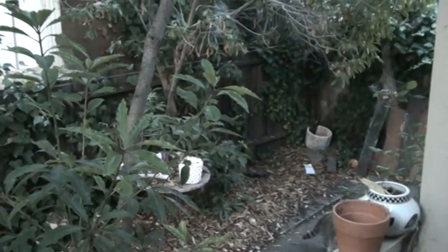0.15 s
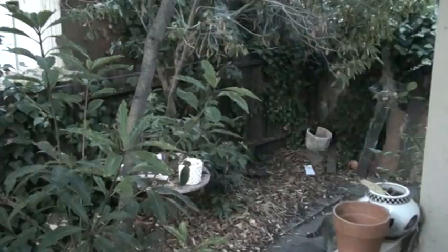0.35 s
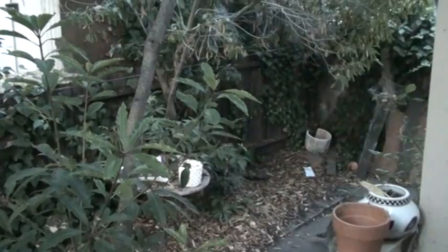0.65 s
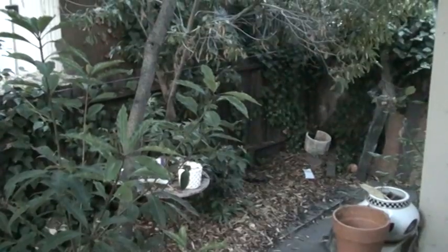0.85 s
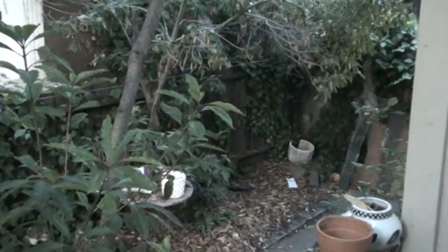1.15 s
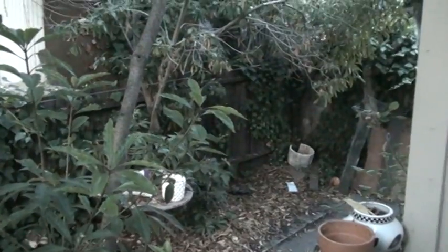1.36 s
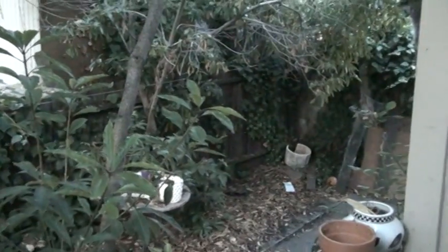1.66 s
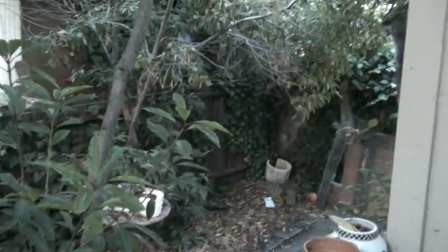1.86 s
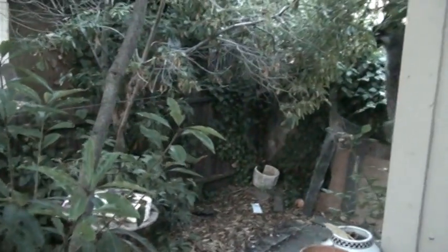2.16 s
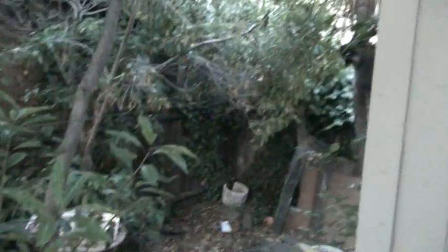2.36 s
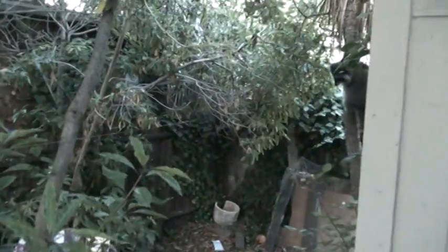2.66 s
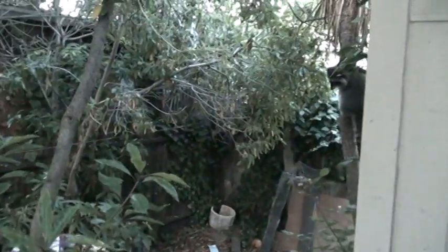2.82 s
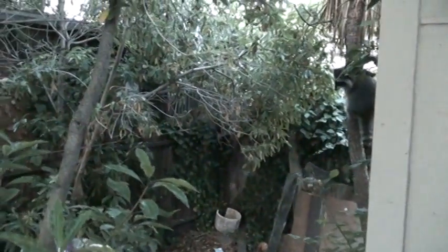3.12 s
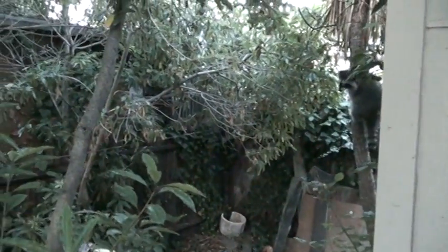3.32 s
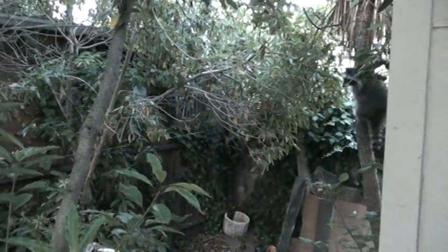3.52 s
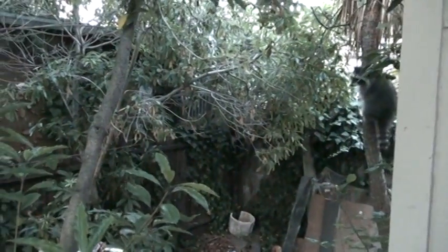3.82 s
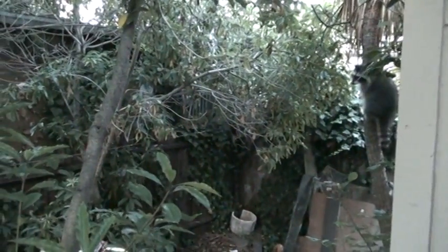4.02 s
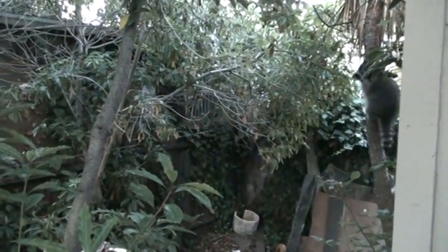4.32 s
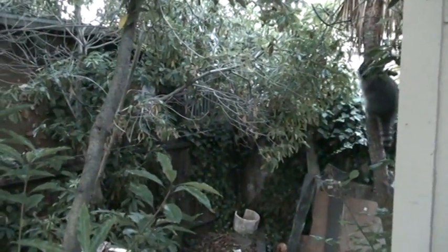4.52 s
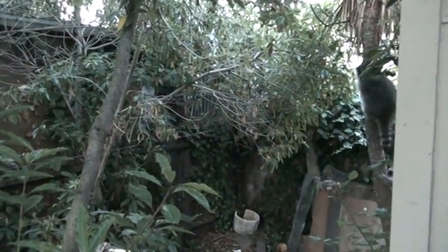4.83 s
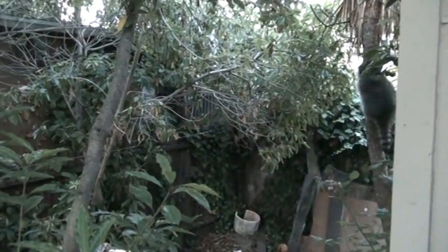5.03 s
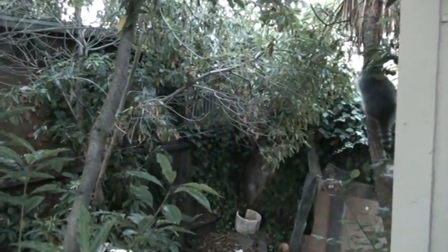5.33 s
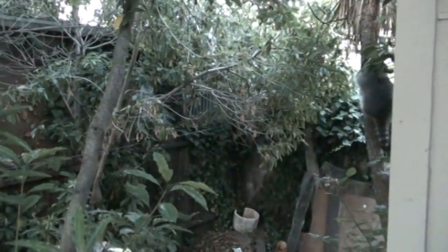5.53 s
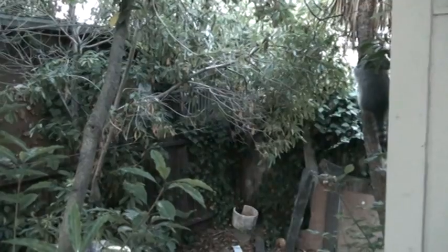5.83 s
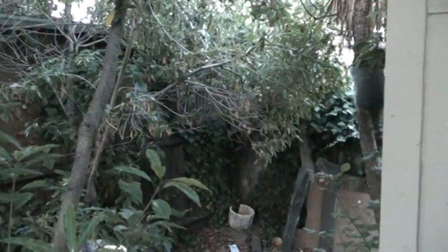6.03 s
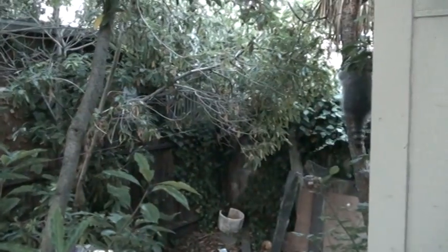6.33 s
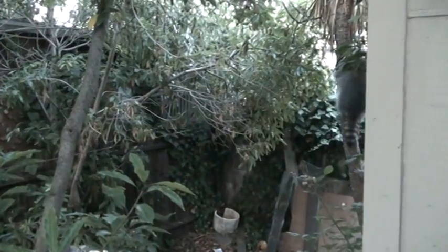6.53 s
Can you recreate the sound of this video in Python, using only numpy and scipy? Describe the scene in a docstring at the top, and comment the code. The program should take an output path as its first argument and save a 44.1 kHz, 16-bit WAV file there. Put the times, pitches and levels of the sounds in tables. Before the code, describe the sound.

A small leafy backyard with steady low traffic rumble and an uneven deep hum. Claws snap and scratch on bark, leaves rustle softly, and a far bird whistles. A raccoon in the foliage rasps and breaks into a short squeal early, again past the middle, then a much louder, closer scream starts rising just as it ends.

```python
"""Raccoons chitter in a small fenced backyard: two rasping, rising calls from the foliage, then a loud one close by.
Each voice is unsteady vocal folds and pulsing air, shaped by a throat that moves as the mouth opens.
Claws scratch on bark in bursts of tiny snaps, leaves rustle as filtered hiss, a far bird whistles gliding sines.
The city sounds underneath as shaped noise, with a deep, unsteady hum, and the camera adds a thin whine."""
import sys
import numpy as np
from scipy import signal
from scipy.fft import rfft, irfft
from scipy.io import wavfile
from scipy.ndimage import uniform_filter1d

SR = 44100
rng = np.random.default_rng(int(sys.argv[2]) if len(sys.argv) > 2 else 0)


def transcribe(signal):
    """Save signal, clipped to [-1, 1], as a 16-bit WAV file at the path in sys.argv[1]."""
    frames = np.atleast_2d(signal).T
    limited = np.clip(frames, -1, 1)
    pcm = np.round(limited * 32767).astype(np.int16)
    wavfile.write(sys.argv[1], SR, pcm)


N = 294308
TIME = np.arange(N) / SR
BINS = np.maximum(np.fft.rfftfreq(N, 1 / SR), 1)   # Hz, kept off zero for the log axis
CUTOFF_HZ = 16400   # top of the band


def from_db(db):
    """Decibels to gain."""
    return 10 ** (np.asarray(db) / 20)


def rms_one(x):
    """Scale to unit power."""
    return x / np.sqrt(np.mean(x ** 2) + 1e-20)


def in_time(rows):
    """Each column of a curve at every sample."""
    s, *columns = np.transpose(rows)
    return [np.interp(TIME, s, c) for c in columns]


def at_hz(points, hz):
    """Read a spectrum on a log-frequency axis."""
    f, value = np.transpose(points)
    return np.interp(np.log(hz), np.log(f), value)


def coloured(x, colour):
    """Filter a sound by a spectrum in dB."""
    return irfft(rfft(x) * from_db(at_hz(colour, BINS)), N)


def drift(rate_hz):
    """Random wander of spread 1, mostly slower than the given rate."""
    return rms_one(irfft(rfft(rng.standard_normal(N)) / (1 + (BINS / rate_hz) ** 2), N))


def step(at_s, glide_s):
    """A smooth passage from 0 to 1 around a moment."""
    return .5 + .5 * np.tanh((TIME - at_s) / glide_s)


def pan(x, lean_db):
    """Lean a sound to the left by a level difference."""
    return x * from_db(np.array([[.5], [-.5]]) * lean_db)


def yard(x, wet_db, early_db, spread, lead_s=0):
    """Direct sound, a few hard echoes from wall and fence, and a tail scattered by leaves; power is kept."""
    t60_s, leaf_cut_hz, build_up_s = 0.46, 13000, 0.00097
    echoes = 12
    t = TIME[:SR // 2]
    shared, left, right = rng.standard_normal((3, len(t)))
    scatter = shared + spread * np.array([left, right])
    scatter = scatter * from_db(-60 * t / t60_s) * (1 - np.exp(-t / build_up_s))
    scatter = signal.sosfilt(signal.butter(1, leaf_cut_hz, fs=SR, output="sos"), scatter)
    response = from_db(wet_db) * rms_one(scatter) / np.sqrt(len(t))
    for delay_s in rng.uniform(.003, .028, size=echoes):
        for ear in response:   # echoes from the sides reach the two ears at slightly different times
            ear_lag = int(spread * rng.uniform(0, 1e-4) * SR)
            ear[int(delay_s * SR) + ear_lag] += from_db(early_db) / np.sqrt(echoes)
    response[0, 0] += 1
    response[1, int(lead_s * SR)] += 1   # the left ear may hear the direct sound first
    response /= np.sqrt(np.sum(response ** 2) / 2)
    return signal.fftconvolve(x[None], response, axes=1)[:, :N]


def city():
    """A wash of far traffic with droning bands in it, alike in both ears in the bass."""
    # colour of the city wash: hz, density_db (per Hz, relative)
    wash_colour = [(22, -21), (38, -3), (60, 0.5), (100, -4), (190, 0), (235, -9), (370, -11), (550, -16.5),
                   (760, -16.5), (1300, -22.5), (2600, -30), (4500, -33.5), (7000, -35.5), (10000, -41.5),
                   (16000, -42)]
    # droning bands of traffic and machines: hz, width_hz, level_db
    drones = [(67.7, 3.6, -57.5), (81.2, 5, -53.5), (127.4, 24, -57), (163.4, 13, -57.5),
              (205.5, 5.7, -60.5), (241, 5.6, -68.5), (273.2, 19, -58.5), (291.4, 6.3, -62),
              (454.2, 8.9, -66.5), (499, 27, -62.5), (593, 16, -67.5), (1856, 120, -77)]
    # left-right likeness of the ambience: hz, correlation
    likeness = [(30, .9998), (100, .9995), (200, .994), (330, .91), (650, .66), (1400, .5), (4000, .55),
                (9000, .65), (12000, .995)]
    # its lean, left over right: hz, lean_db
    lean = [(170, 0), (380, -1), (700, -2.6), (1500, -.8), (4000, .3), (12000, 0)]
    wash_db = -49
    wash = from_db(at_hz(wash_colour, BINS)) ** 2
    power = from_db(wash_db) ** 2 * wash / wash.mean()
    for hz, width_hz, level_db in drones:
        band = 1 / (1 + ((BINS - hz) / width_hz) ** 2) ** 2
        power = power + from_db(level_db) ** 2 * band / band.mean()
    mid, side = rfft(rng.standard_normal((2, N)))
    alike = np.clip(at_hz(likeness, BINS), 0, 1)
    ears = np.sqrt((1 + alike) / 2) * mid + np.sqrt((1 - alike) / 2) * side * [[1], [-1]]
    return irfft(pan(ears, at_hz(lean, BINS)) * np.sqrt(power), N)


def road(side_db):
    """Tyres and engines a few streets away, heard as one low band, nearly alike in both ears."""
    # road rumble that comes and goes: time_s, level_db
    rumble = [(0, -50.5), (.8, -53), (2.3, -65.5), (3.4, -49.5), (4.1, -56.5), (5.3, -56), (5.8, -50.5),
              (6.67, -52.5)]
    centre_hz, width_hz = 184.5, 40.5
    band = 1 / (1 + ((BINS - centre_hz) / width_hz) ** 2) ** 2
    mid, side = irfft(rfft(rng.standard_normal((2, N))) * band, N)
    ears = mid + from_db(side_db) * side * [[1], [-1]]
    return from_db(in_time(rumble)[0]) * rms_one(ears)


def deep_hum(third_db):
    """A deep, unsteady hum near 40 Hz with a weaker third harmonic, wandering in pitch and level."""
    # uneven level of the hum, before its flutter: time_s, level_db
    hum_level = [(0.0, -54), (0.17, -41.5), (0.98, -56), (1.15, -77), (1.39, -44), (1.95, -62), (2.17, -47),
                 (2.62, -75), (2.79, -51.5), (3.27, -76), (3.34, -54), (3.73, -62), (3.86, -49.5),
                 (4.31, -69), (4.68, -48.5), (4.81, -60), (5.59, -49.5), (6.67, -57.5)]
    hum_hz, wander_hz, flutter_db = 40.4, 1.77, 2.3
    phase = 2 * np.pi * np.cumsum(hum_hz + wander_hz * drift(8.7)) / SR
    gain = from_db(in_time(hum_level)[0] + flutter_db * drift(14))
    return gain * np.sqrt(2) * (np.sin(phase) + from_db(third_db) * np.sin(3 * phase))


def camera_whine(wander_hz, rate_hz):
    """Thin, faint sines from the camera, each wandering in pitch on its own."""
    # whine: pitch_hz, level_db
    whines = [(7900, -82), (7200, -92), (15735, -97)]
    out = np.zeros(N)
    for pitch_hz, level_db in whines:
        phase = 2 * np.pi * np.cumsum(pitch_hz + wander_hz * drift(rate_hz)) / SR
        out += from_db(level_db) * np.sqrt(2) * np.sin(phase)
    return out


def bird(waver):
    """Pure gliding whistles that swell quickly and fade as the glide slows."""
    # whistles, dry: start_s, length_s, start_hz, end_hz, level_db
    whistles = [ (0.433, .1, 4130, 3650, -70), (0.458, .07, 4400, 4120, -67),
                (0.547, .05, 3380, 3800, -63.5), (0.607, .065, 5800, 6200, -62),
                (0.667, .085, 3220, 2850, -65.5), (1.768, .07, 4570, 5120, -64),
                (2.05, 0.15, 3400, 3630, -72), (2.413, 0.064, 6360, 6520, -65),
                (2.839, .16, 3280, 3600, -70), (2.26, .08, 5100, 5350, -71), (2.44, .06, 4400, 4480, -69),
                (3.545, 0.05, 4200, 4260, -67), (3.591, .3, 4620, 3820, -63.5),
                (5.03, .04, 4550, 4080, -69), (5.105, 0.21, 4980, 4150, -67), (5.40, 0.35, 6060, 5340, -73)]
    peak_share, glide_ease = .33, .75   # loudest a third of the way through; the glide slows towards the end
    fade_db = 16   # per whole length, counted from the peak
    out, wobble = np.zeros(N), 1 + waver * drift(76)
    for start_s, length_s, start_hz, end_hz, level_db in whistles:
        on = (TIME >= start_s) & (TIME < start_s + length_s)
        part = (TIME[on] - start_s) / length_s
        hz = (start_hz + (end_hz - start_hz) * part ** glide_ease) * wobble[on]
        swell = np.clip(np.minimum(part / peak_share, 10 * (1 - part)), 0, 1)
        gain = swell * from_db(level_db - fade_db * np.maximum(part - peak_share, 0))
        out[on] += gain * np.sqrt(2) * np.sin(2 * np.pi * np.cumsum(hz) / SR)
    return out


def foliage(flicker_db):
    """A soft, uneven bed of leaves rubbing together."""
    # foliage stirring under the climbing animals, dry: time_s, level_db
    stir = [(0, -84), (1.1, -109), (1.55, -63.5), (2.1, -69.5), (3.45, -70), (4.0, -74.5), (4.6, -65.5),
            (4.8, -85), (5.8, -65.5), (6.1, -73), (6.4, -66.5)]
    # colour of the stirring leaves: hz, density_db (per Hz, relative)
    leaf_colour = [(1000, -31), (2500, -3), (4500, -5.5), (6100, 5), (7500, -0.5), (9500, -3), (11500, -2),
                   (13000, 0), (16000, -30)]
    hiss = rms_one(coloured(rng.standard_normal(N), leaf_colour))
    return hiss * from_db(in_time(stir)[0] + flicker_db * drift(25))


def scratches(grain_db, grains_per_s):
    """Each scratch is a swell of tiny fibre snaps in one broad band."""
    # the louder scratches on bark and through leaves, dry: peak_s, level_db (at the peak), centre_hz,
    # width_octaves, rise_s
    strokes = [ (0.05, -50, 3400, 1.2, 0.003), (.257, -61, 7000, .8, .004),
               (1.395, -49, 11500, 0.83, 0.0099), (1.592, -55, 7600, .89, 0.016),
               (1.878, -62, 6230, .5, .006), (2.225, -59.5, 4940, .98, .005),
               (2.632, -58.5, 8420, .53, .003), (2.751, -46.5, 8350, 0.86, 0.0032),
               (3.075, -57, 6600, 0.6, 0.023), (3.42, -63, 8000, .7, 0.074),
               (3.522, -57.5, 7500, .7, 0.018), (4.09, -55, 9000, 0.67, 0.016),
               (4.895, -58.5, 7900, 1.1, 0.034), (4.935, -60, 15000, .2, .015),
               (5.18, -64, 10000, .7, 0.033), (5.731, -49, 7000, 1.23, 0.0051),
               (6.138, -50.5, 10500, .83, .016)]
    decay_s, decay_per_rise = 0.014, .9   # a slower stroke also dies away more slowly
    out, t = np.zeros(N + SR), TIME[:SR // 2]
    hz = np.maximum(np.fft.rfftfreq(len(t), 1 / SR), 1)
    lead = SR // 8   # samples of room for the rise before the peak
    age = t - lead / SR
    for peak_s, level_db, centre_hz, octaves, rise_s in strokes:
        snaps = rng.standard_normal(len(t)) * (rng.random(len(t)) < grains_per_s / SR)
        snaps = snaps * from_db(grain_db * np.minimum(rng.exponential(1, len(t)), 4))   # a few snap harder
        band = 1 / (1 + (np.log2(hz / centre_hz) / (2 * octaves)) ** 2) ** 3
        rasping = rms_one(irfft(rfft(snaps) * band, len(t)))
        swell = np.exp(np.minimum(age / rise_s, -age / (decay_s + decay_per_rise * rise_s)))
        start = int(peak_s * SR)
        out[start:start + len(t)] += from_db(level_db) * swell * rasping
    return out[lead:lead + N]


def climbing():
    """Claws on bark and stirring leaves share one colour and the same place in the yard."""
    # colour shared by every rustle: hz, gain_db
    rustle_colour = [(2000, 4), (3200, 2.5), (5000, 0.5), (6200, -0.5), (7000, -2), (9000, -2),
                     (11500, -1.5), (13000, -7), (15000, -4)]
    rustle = scratches(grain_db=1.2, grains_per_s=6700) + foliage(flicker_db=2.5)
    rustle = coloured(rustle, rustle_colour)
    return pan(yard(rustle, wet_db=-7.5, early_db=-7, spread=0.56), 0.71)


def throat_filter(source, opening, throat):
    """Pass the sound through resonances that follow the opening of the mouth."""
    mouth_cut_hz = 1220
    hz, s, frames = signal.stft(source, SR, nperseg=512, noverlap=384)
    hz, opening, power = hz[:, None], np.interp(s, TIME[:len(source)], opening), 0
    for shut_hz, open_hz, width_hz, shut_db, open_db in throat:
        away = (hz - shut_hz - (open_hz - shut_hz) * opening) / width_hz
        strength = from_db(shut_db + (open_db - shut_db) * opening ** 2)   # goes with the area of the mouth
        power = power + (strength / (1 + away ** 2)) ** 2
    radiated = hz ** 4 / (hz ** 4 + mouth_cut_hz ** 4)   # a small mouth radiates little bass
    shaped = frames * np.sqrt(power) * radiated
    return signal.istft(shaped, SR, nperseg=512, noverlap=384)[1][:len(source)]


def raccoon(pitch, rough, opening, gain, throat, jitter, rasp, flutter_db):
    """Unsteady vocal folds and air that hisses through them each cycle, shaped by the throat."""
    on = gain > 0
    pitch, rough, opening = pitch[on], np.clip(rough[on], 0, 1), np.clip(opening[on], 0, 1)
    hz = pitch * (1 + jitter * rough * drift(213)[on])
    phase = 2 * np.pi * np.cumsum(hz) / SR
    folds = np.zeros(len(phase))
    for k in range(1, 32):
        partial = np.cos(k * phase + rng.uniform(0, 2 * np.pi))
        folds += partial * (k * hz < CUTOFF_HZ)
    folds = rms_one(folds * np.sqrt(hz))
    air = rms_one(rng.standard_normal(len(phase)) * (1 + 0.36 * np.cos(phase)))
    source = np.sqrt(1 - rough ** 2) * folds + rasp * rough * air
    voice = throat_filter(source, opening, throat)
    # level the voice over about 9 ms, so that gain and flutter set its loudness
    evened = voice / np.sqrt(uniform_filter1d(voice ** 2, size=400) + 1e-9)
    out = np.zeros(N)
    out[on] = evened * gain[on] * from_db(flutter_db * drift(135)[on])
    return out


def far_call(start_s, break_s, end_s, level_db, squeal_hz, fade_db_per_s):
    """The voice climbs through three registers, each cleaner than the last; the squeal sags and fades."""
    # throat resonances, moving as the mouth opens: shut_hz, open_hz, width_hz, shut_db, open_db
    far_throat = [(1760, 2670, 255, 0.5, -7), (3020, 3020, 130, 7.5, -1), (3380, 4150, 380, -4, 5.5),
                  (4840, 5900, 1900, -9, -6), (6770, 5400, 390, -1, -6), (7750, 7400, 650, -7, -7),
                  (11300, 9500, 1400, -23, -19)]
    rasp_hz, cry_hz, squeal_sag_hz_per_s = 523, 769.4, 1100
    rasp_rough, cry_rough, squeal_rough = .88, 0.725, 0.32
    cry_share = .39   # the cry sets in at this share of the way to the break
    cry_glide_s, break_glide_s = 0.019, 0.00782
    # the mouth is ajar in the cry and gapes just before the break
    cry_opening, mouth_lead_s, mouth_glide_s = 0.22, .014, 0.023
    attack_s, release_s = 0.029, 0.012
    rasp_db = -1   # the rasp is softer than the cry

    cry = step(start_s + cry_share * (break_s - start_s), cry_glide_s)
    squeal = step(break_s, break_glide_s)
    since_break = np.maximum(TIME - break_s, 0)
    pitch = rasp_hz + (cry_hz - rasp_hz) * cry + (squeal_hz - cry_hz) * squeal
    pitch = pitch - squeal_sag_hz_per_s * since_break
    rough = rasp_rough + (cry_rough - rasp_rough) * cry + (squeal_rough - cry_rough) * squeal
    gape = step(break_s - mouth_lead_s, mouth_glide_s)
    opening = cry_opening * cry + (1 - cry_opening) * gape
    envelope = np.clip(np.minimum((TIME - start_s) / attack_s, (end_s - TIME) / release_s), 0, 1)
    gain = envelope * from_db(level_db + rasp_db * (0.5 - cry) - fade_db_per_s * since_break)
    return raccoon(pitch, rough, opening, gain, far_throat, jitter=0.0366, rasp=0.97, flutter_db=1.5)


def far_calls():
    """Calls from the foliage: a rasp steps up to a cry and breaks into a squeal, with strong yard echo."""
    # calls, dry: start_s, break_s, end_s, level_db (midway from rasp to cry), squeal_hz, fade_db_per_s (squeal)
    calls = [(1.109, 1.317, 1.446, -51, 1322, 79), (4.274, 4.498, 4.58, -51, 1295, 101)]
    voices = sum(far_call(*call) for call in calls)
    return pan(yard(voices, wet_db=-3, early_db=-2.0, spread=0.86), 2.2)


def near_call():
    """A loud scream slides from a rasp up to a squeal; the mouth opens as the pitch rises."""
    # throat resonances, moving as the mouth opens: shut_hz, open_hz, width_hz, shut_db, open_db
    near_throat = [(1910, 2560, 383, -7, -4.5), (2460, 4500, 620, -11.5, -2), (3700, 3900, 310, -6.5, 4),
                   (4600, 3570, 350, 0, -2), (5360, 4900, 340, -1, -29), (6260, 6000, 390, -6, 7.5),
                   (7050, 8100, 730, -11, -5), (9100, 8600, 1600, -10.5, -11), (13500, 8600, 3700, -23, -9)]
    # one long upward glide, dry: time_s, pitch_hz, roughness (0-1), level_db
    glide = [(6.474, 550, 0.53, -41.5), (6.507, 526.4, 0.54, -28), (6.53, 717.5, .36, -31),
             (6.553, 744, 0.22, -25), (6.572, 799, .2, -27), (6.594, 905, 0.36, -30.5),
             (6.619, 1046, 0.27, -25.5), (6.641, 1109, 0.32, -33), (6.655, 1234, 0.25, -28.5),
             (6.69, 1268, 0.07, -35)]
    attack_s = .006   # fades in just ahead of the first row
    pitch, rough, level_db = in_time(glide)
    opening = (pitch - pitch.min()) / np.ptp(pitch)
    gain = from_db(level_db) * np.clip(1 + (TIME - glide[0][0]) / attack_s, 0, 1)
    voice = raccoon(pitch, rough, opening, gain, near_throat, jitter=0.057, rasp=.73, flutter_db=1.5)
    return pan(yard(voice, wet_db=-4, early_db=-5, spread=.7, lead_s=2.5e-5), 3.3)


def scene():
    """Two animals at different distances, their climbing, the bird and the background."""
    background = city() + road(side_db=-41) + deep_hum(third_db=-6.5)
    background = background + camera_whine(wander_hz=28, rate_hz=123)
    whistles = yard(bird(waver=0.0053), wet_db=-3.5, early_db=-7, spread=.9)
    return background + whistles + climbing() + far_calls() + near_call()


def record(dry):
    """The top of the band is cut steeply."""
    return signal.sosfilt(signal.ellip(12, .1, 80, CUTOFF_HZ, fs=SR, output="sos"), dry)


dry = scene()
out = record(dry)
transcribe(out)
```